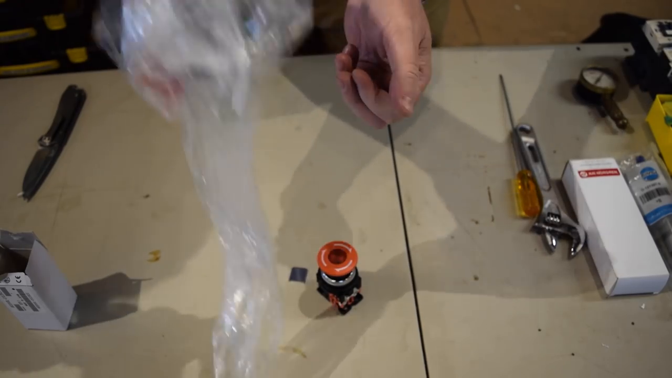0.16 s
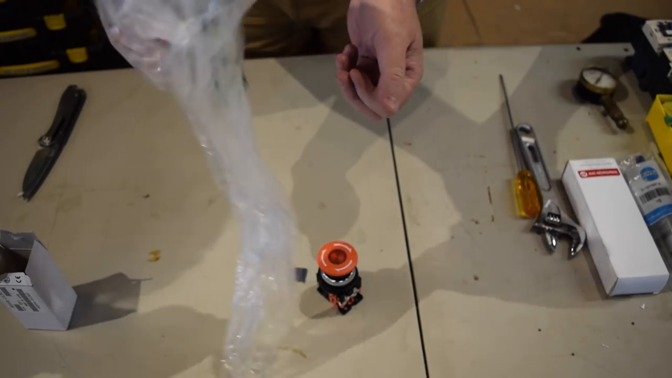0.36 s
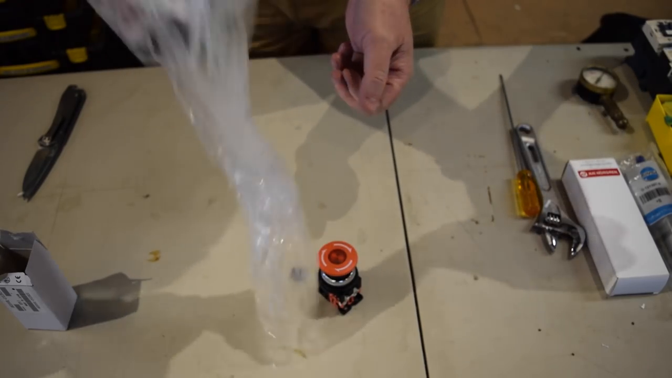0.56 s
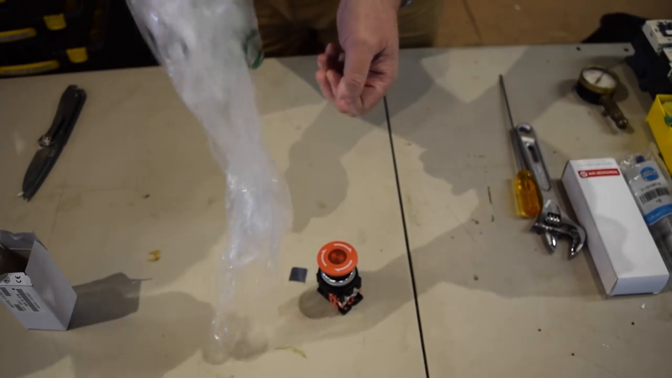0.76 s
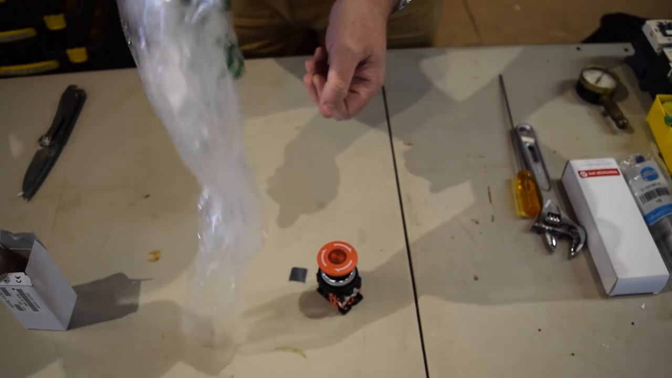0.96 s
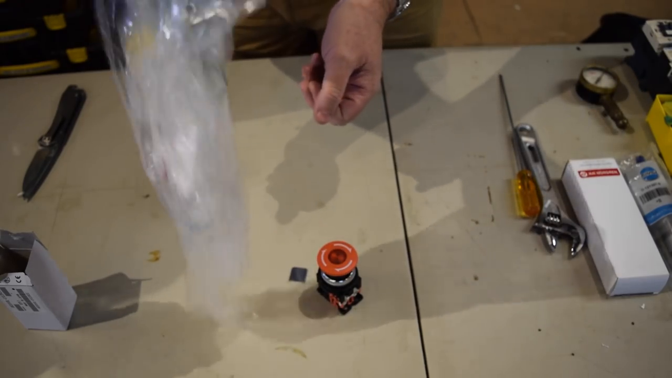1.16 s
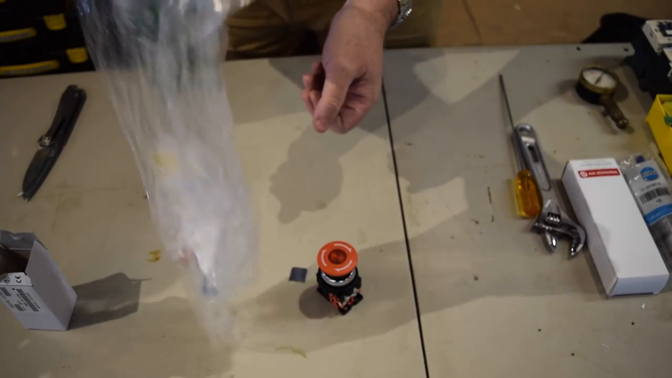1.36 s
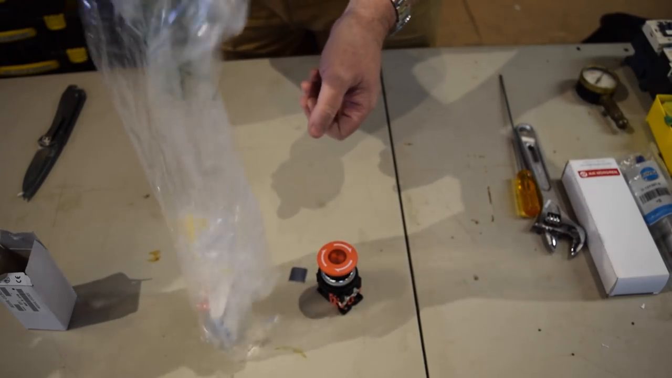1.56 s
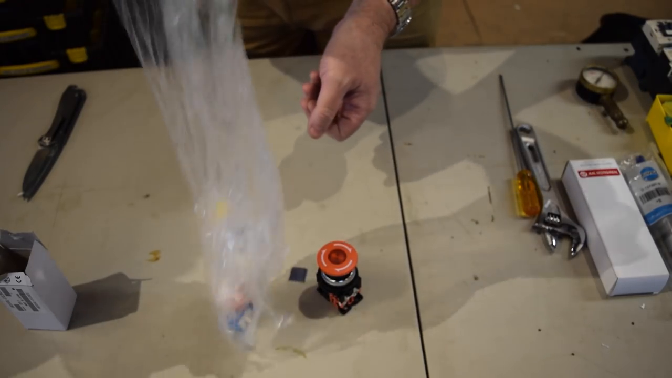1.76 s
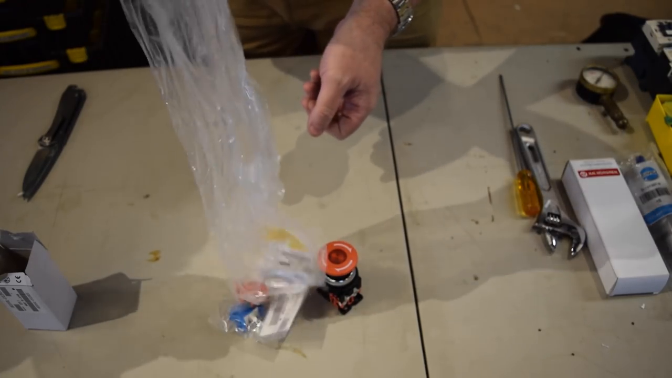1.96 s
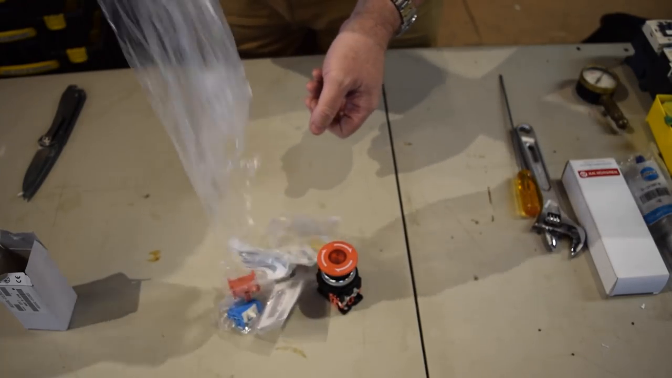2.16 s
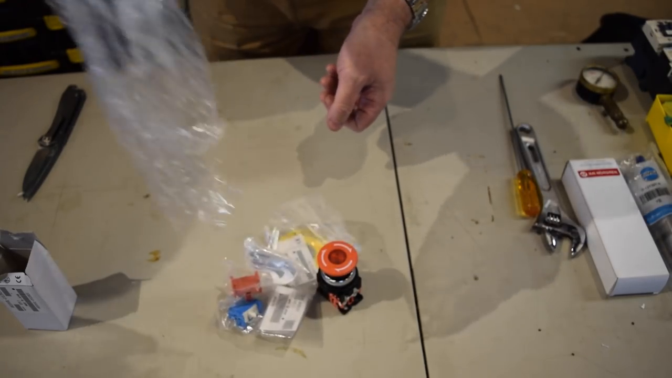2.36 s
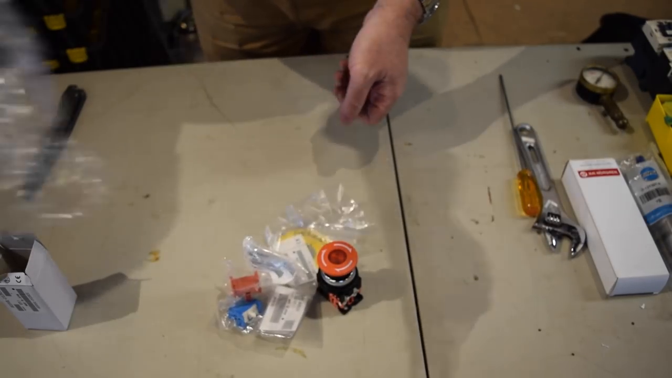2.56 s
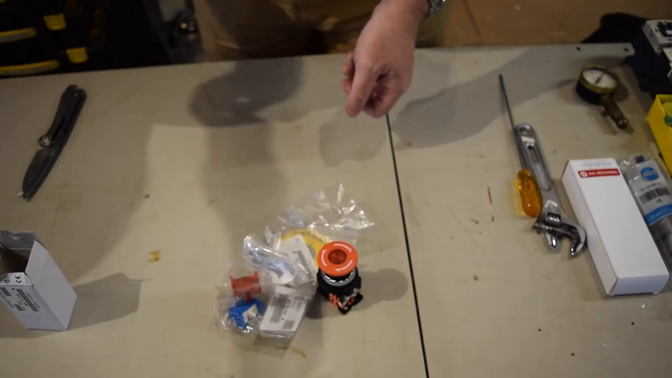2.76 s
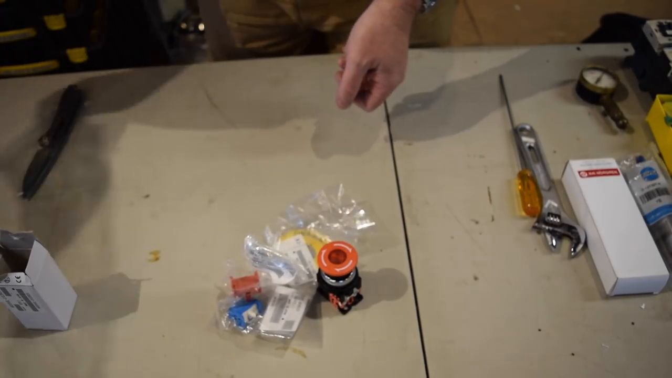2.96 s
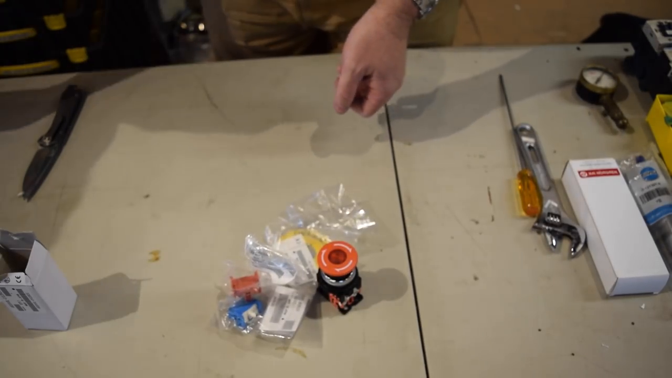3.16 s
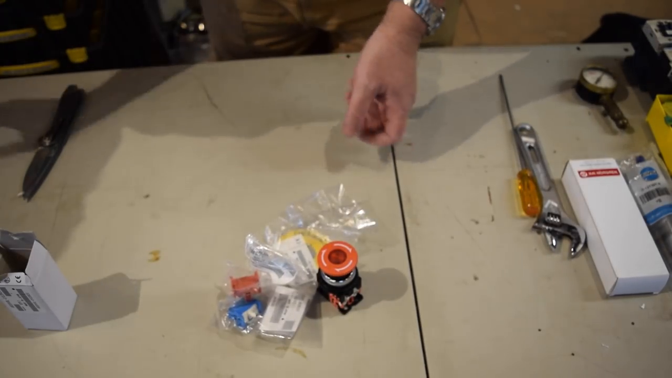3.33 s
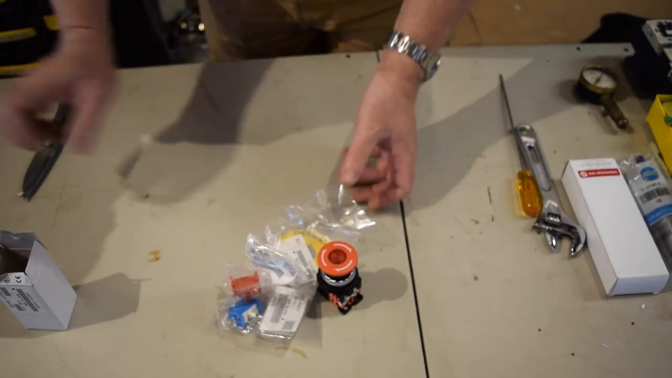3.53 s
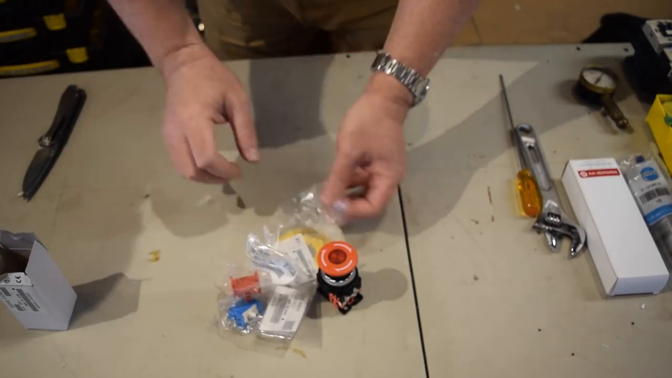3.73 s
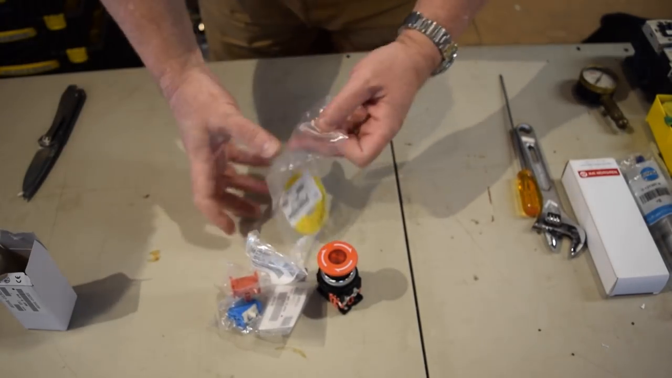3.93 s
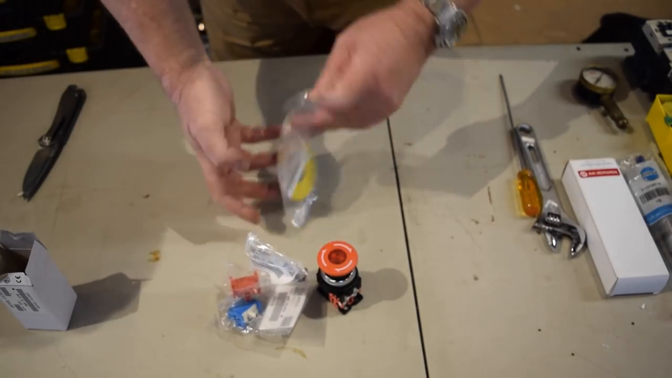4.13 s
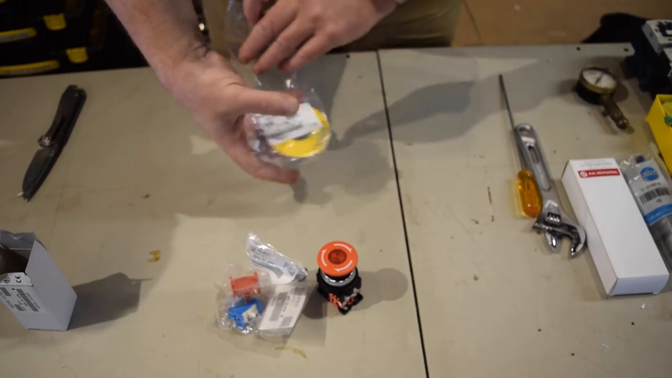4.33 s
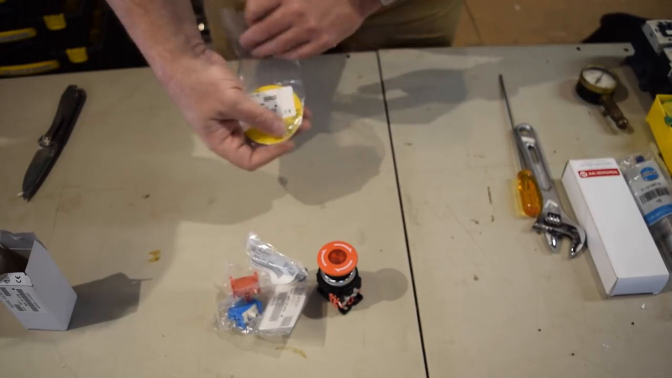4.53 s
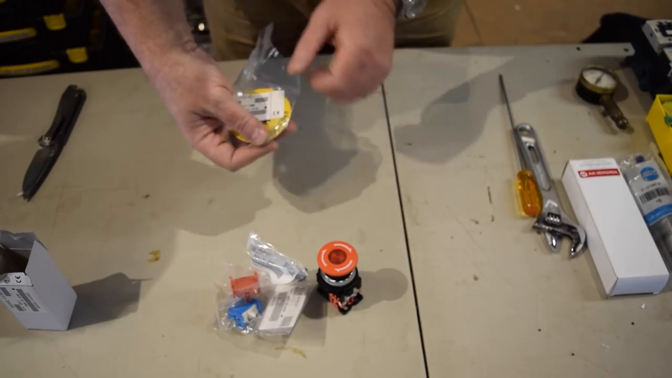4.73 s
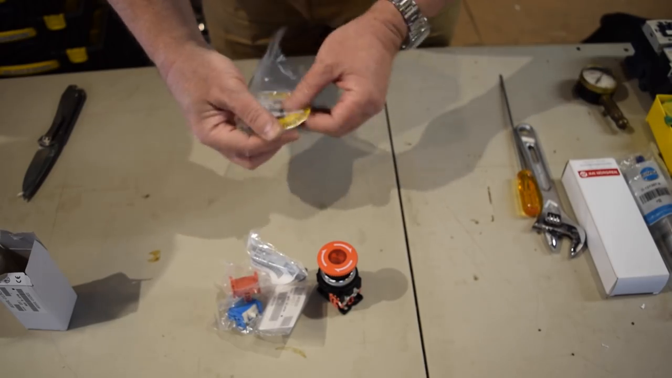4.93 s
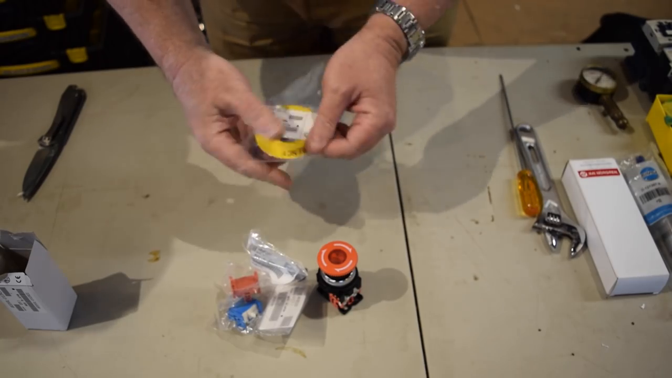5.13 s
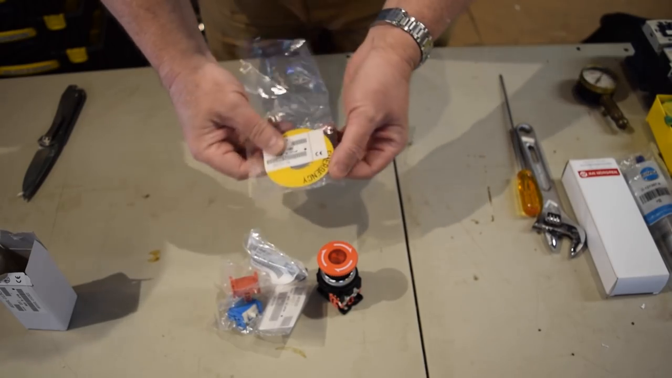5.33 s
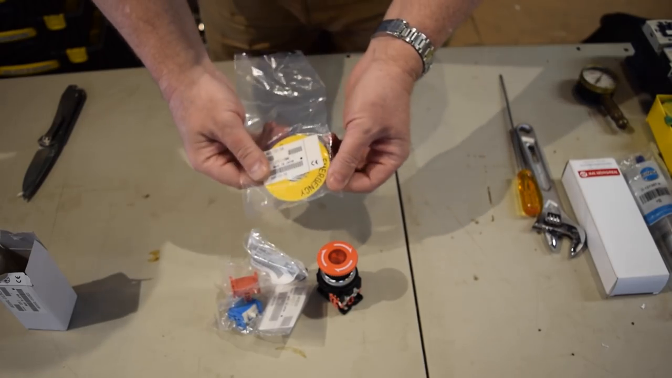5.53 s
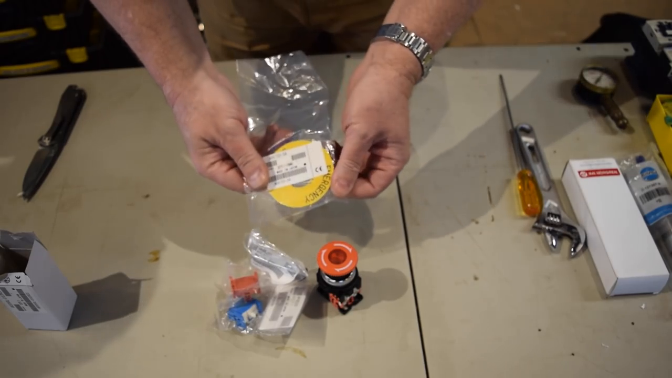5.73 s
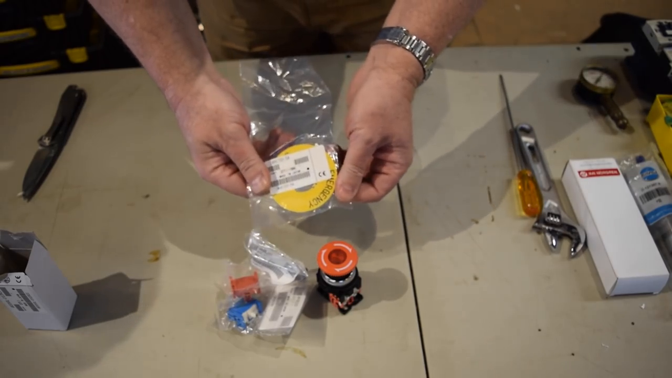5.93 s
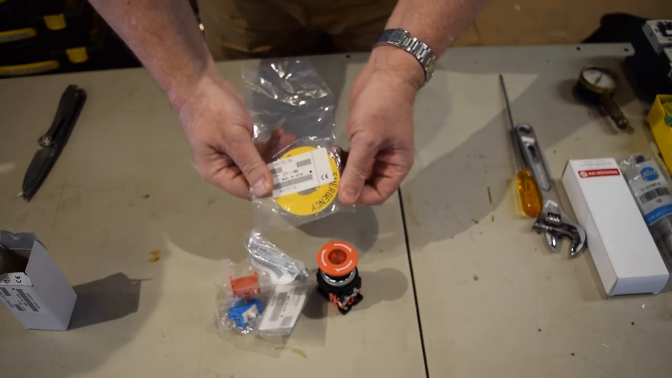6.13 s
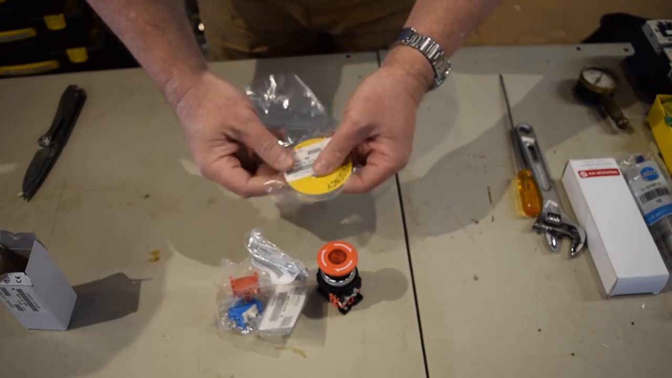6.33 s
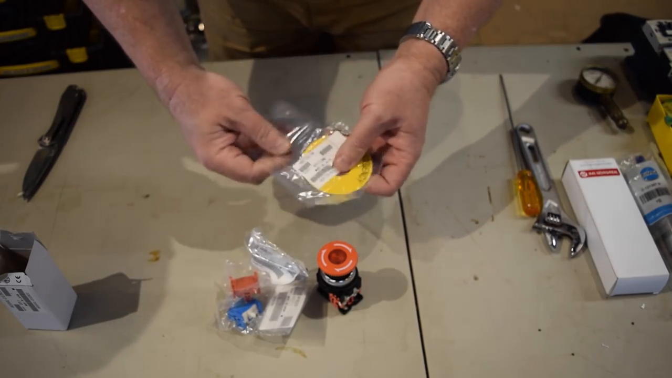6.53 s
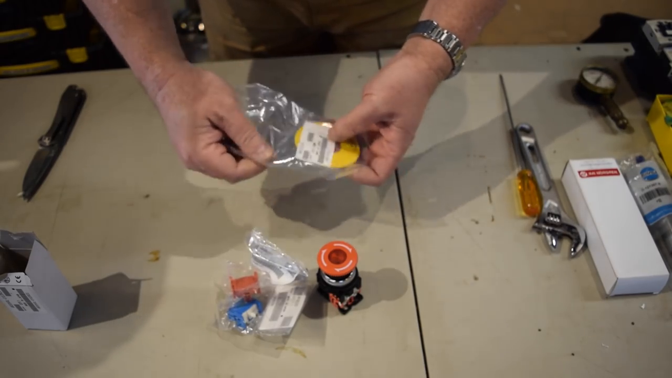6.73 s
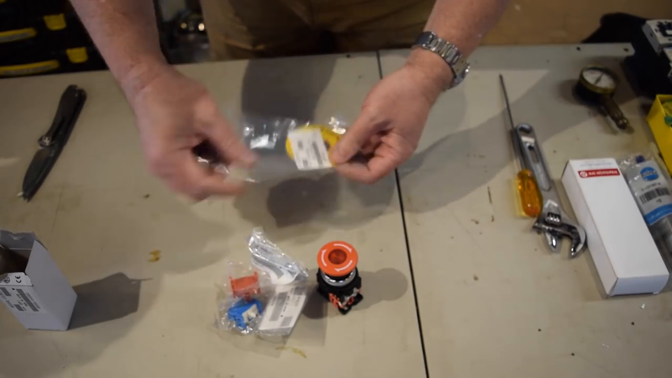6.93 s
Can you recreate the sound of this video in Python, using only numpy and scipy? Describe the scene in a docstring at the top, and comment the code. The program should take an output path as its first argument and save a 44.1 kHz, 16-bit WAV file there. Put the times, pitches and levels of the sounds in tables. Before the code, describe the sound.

Dense rushes of loose plastic film come roughly five or six a second, then a woody thump and clatter as small parts land on a workbench. After that everything is much quieter: sparse limp bag crinkles, a near pause, then intermittent brittle crackling of a small packet pressed and turned around a plastic disc. Close, fairly dry microphone, short room tail, steady low machine hum and soft air noise.

```python
"""A long plastic bag is shaken over a workbench: each shake is a dense rush of buckling film facets.
Bagged parts slide out and knock on the top, as damped bench modes with a clack of their plastic shells.
The limp, empty bag is put aside with sparser crinkles; fingers then pick up a small packet and turn it
over, its stiffer film crinkling against a resonant disc. Short ringing snaps of creases, parts and disc
stand out, in a small workshop whose air noise, steady hum lines and deep throb last from start to end."""
import sys
import numpy as np
from scipy import signal
from scipy.fft import rfft, irfft, next_fast_len
from scipy.io import wavfile
from scipy.ndimage import map_coordinates

SR = 44100
rng = np.random.default_rng(int(sys.argv[2]) if len(sys.argv) > 2 else 0)


def inscribe(sig):
    """Save sig as 16-bit PCM at rate SR to the path in sys.argv[1].

    A 1-D sig is mono; a 2-D sig holds one channel per row.
    Samples are clipped to [-1, 1] before scaling.
    """
    pcm = np.round(np.clip(np.atleast_2d(sig).T, -1, 1) * 32767)
    wavfile.write(sys.argv[1], SR, pcm.astype(np.int16))


N = 308259

# Shakes of the long bag. Each row: centre in seconds, peak level in dB, fall to 1/e in seconds.
BAG_SHAKES = [(0.11, -23.5, .02), (.271, -23.5, .019), (0.436, -25.5, .027), (.606, -25, .032),
              (.797, -25.5, .028), (0.984, -26, 0.028), (1.177, -28, .045), (1.37, -30, .045)]
# Rustle of the long bag between shakes, fading as it empties. Each row: time in seconds, level in dB.
BAG_RUSTLE = [(0, -37.5), (1.22, -36), (1.55, -39), (1.68, -44.5), (1.8, -42), (1.9, -47), (2.15, -47),
              (2.36, -57.5), (2.6, -100)]
# Spectrum of the long bag's film. Each row: frequency in Hz, relative density in dB per Hz.
BAG_SPECTRUM = [(120, -23), (200, -6), (273, 7), (299, 3), (558, 8), (899, 4), (1270, 4.5), (1420, 2.5),
                (3310, 3.5), (3690, 2.5), (10300, 1.5), (13800, -4.5), (16000, -18)]
# Sweeps of the limp, empty bag, swung aside and laid down.
# Each row: start of the hold in seconds, hold in seconds, level in dB.
EMPTY_BAG_SWEEPS = [(2.403, 0.011, -42.5), (2.452, 0.034, -44), (2.6, 0.084, -51.5), (3.158, 0.0268, -39.5),
                    (3.238, 0.034, -40), (3.29, .025, -51)]
# Spectrum of the empty bag's film. Each row: frequency in Hz, relative density in dB per Hz.
EMPTY_BAG_SPECTRUM = [(200, -9), (700, -3.5), (1200, -8), (1600, -8), (2050, -4.5), (2900, -8.5),
                      (5000, -8.5), (10000, -15.5), (16000, -27)]
# Parts meeting the bench. Each row: time in seconds, blow in relative dB, hardness of contact in dB,
# level of the part's clack in dB, pitch of the clack in Hz.
PART_KNOCKS = [(1.5012, -0.5, 0, -23, 4300), (1.504, -8.5, -3, -32, 3750), (1.526, -6.5, 3.5, -26, 3230),
               (1.594, -32, 7, -50, 3200), (1.68, -29, 3, -56, 3030), (1.774, -24.5, 6, -40, 2640),
               (1.796, -20.5, 0, -33, 2670), (1.812, -16.5, -0.5, -24, 3040), (2.054, -9, 4, -25, 3860),
               (2.0591, -21.5, 5, -36, 3900), (2.113, -28, 6, -39, 3140), (2.301, -28.5, 7, -37, 3770),
               (3.953, -32, 0, -50.5, 4180)]
# Ringing modes of the bench top. Each row: frequency in Hz, relative level in dB.
BENCH_MODES = [(118, 1), (176, 2), (308, 7), (353, 3), (395, 2), (435, -4), (552, 8), (592, 2), (668, 1),
               (713, 1), (759, -7), (919, 1), (948, -4), (1224, -3)]
# The bench's dense, short-lived modes. Each row: frequency in Hz, relative density in dB per Hz.
THUD_SPECTRUM = [(50, -22), (115, -7), (160, -4), (240, -10.5), (310, 2), (450, 1), (700, -3), (1000, -3),
                 (1450, -9), (1900, -16.5), (2600, -19.5), (3500, -25), (6000, -32.5), (14000, -46)]
# Finger moves on the small packet. Each row: start of the hold in seconds, hold in seconds, level in dB.
PACKET_MOVES = [(3.738, .08, -43), (3.88, .22, -53.5), (4.15, .05, -50.5), (4.275, 0.023, -49),
                (4.357, .045, -43.5), (4.44, .07, -43.5), (4.91, 0.16, -54), (5.165, .1, -48.5),
                (5.395, .03, -46), (6.135, .06, -45.5), (6.26, 0.079, -47), (6.43, 0.071, -44),
                (6.545, 0.05, -41), (6.62, 0.12, -51), (6.86, 0.056, -46), (6.92, 0.05, -40)]
# Spells in which the packet is turned and its film whispers. Each row: start and length in seconds.
PACKET_TURNS = [(3.68, 0.92), (4.85, .7), (6.14, .85)]
TURNING_DB = -57
# Spectrum of the packet's film. Each row: frequency in Hz, relative density in dB per Hz.
PACKET_SPECTRUM = [(150, -9), (450, 0), (700, -6), (1150, -3), (1600, -8.5), (2300, -3.5), (5000, -6),
                   (9000, -7), (14000, -11), (16000, -21)]
# How firmly the film is pressed on the plastic disc. Each row: time in seconds, coupling in dB.
DISC_COUPLING = [(4, -4), (4.48, -1), (5.2, -8), (6.15, 2), (6.33, 5), (6.58, 5), (6.95, -4)]
# The disc's damped modes. Each row: frequency in Hz, relative level in dB.
DISC_MODES = [(450, 0), (860, 6)]
# The loudest snaps: creases snapping through, clacks of parts inside the bag, and taps on the disc.
# Each row: time in seconds, level over the first 4 ms in dB, ring in Hz, treble share in dB before it
# is scaled and limited.
LOUD_SNAPS = [(0.1746, -26, 6660, -4), (0.1806, -26.5, 3320, -7), (.272, -17.5, 2580, -28),
              (.4994, -21.5, 3000, -29), (.511, -31, 8010, 9), (0.7447, -31, 4730, -8),
              (1.0634, -28, 4070, -1), (1.643, -42, 1370, 6), (2.4068, -36, 1850, -7),
              (2.4186, -34.5, 2280, -12), (2.471, -43, 2110, -20), (2.4848, -37, 1850, -25),
              (2.639, -39.5, 11100, 8), (2.6674, -37.5, 2260, -20), (2.7813, -44.5, 10080, 2),
              (2.8038, -40.5, 1940, 3), (2.8198, -44, 5270, -4), (2.9778, -41.5, 1820, 2.5),
              (3.102, -37, 6300, 4), (3.1486, -39, 2890, 0), (3.1682, -35.5, 7740, 2),
              (3.2362, -41, 2100, 1), (3.2479, -41, 2080, 2), (3.6735, -34, 2770, -1),
              (4.0432, -40.5, 10500, 0), (4.0713, -41.5, 8500, 4.5), (4.392, -35.5, 2700, 0),
              (4.449, -25.5, 8300, -12), (4.474, -29.5, 1650, 0), (4.6185, -41.5, 2570, -30),
              (5.0205, -40, 9030, 3), (5.1669, -38.5, 2100, 2), (5.4018, -38, 9900, 1.5),
              (5.4204, -39, 2280, 1.5), (5.4567, -37, 950, 5), (5.508, -36, 11200, 3),
              (5.589, -45, 6370, -12), (6.3226, -29, 1040, -14), (6.5467, -38, 1030, -11),
              (6.599, -33, 4650, -19), (6.781, -37, 2560, -2.5), (6.859, -37.5, 3020, 9),
              (6.965, -35, 5100, 1)]
# Spells of disturbed film in which weaker creases let go. Each row: start and end in seconds,
# snaps a second, middle level in dB, middle ring in Hz, treble share in dB as above.
WEAK_SNAPS = [(0, 1.45, 13.6, -32, 5160, 3.5), (1.594, 2.25, 9, -41.5, 6000, 1),
              (2.411, 2.68, 30.5, -44, 2240, -9), (2.698, 3.12, 22, -50, 4940, -6),
              (3.702, 4.55, 11.3, -49.5, 5500, -5), (4.88, 5.6, 10, -51.5, 4470, -4),
              (6.148, 6.98, 12.7, -43.5, 4050, -1)]
# Decay of the room's diffuse tail. Each row: frequency in Hz, time to fall 60 dB in seconds.
ROOM_DECAY = [(150, 0.81), (1000, 0.96), (4000, 0.84), (14000, 0.033)]
# Air noise of the still workshop. Each row: frequency in Hz, relative density in dB per Hz.
AIR_SPECTRUM = [(25, -32), (50, -4.5), (65, -16), (120, -4.5), (148, -8.5), (190, -4.5), (245, -9.5),
                (290, -8), (520, -15), (1070, -19), (1500, -22), (4000, -34), (10000, -43), (16000, -51)]
# Lines of the machine hum. Each row: frequency in Hz, middle rms level in dB.
HUM_LINES = [(119.5, -57.5), (187, -58), (222, -60), (271, -57.5), (353, -70), (552, -68)]

# every handling stroke rises quickly, holds and dies away
ATTACK_S, RELEASE_DB_PER_S = .012, 257
SNAP_Q, CRACK_DAMPING = 6.2, 0.55  # sharpness of a snap's ring; a hard crack shortens it
STRAY_SPREAD_DB, STRAY_SPREAD_OCTAVES = 6.5, 0.58  # largest departure either way of the weak creases
THROB_HZ, THROB_DB = 43.4, -53  # deep hum and its middle level
BEAT_S, BEAT_CREST_S, BEAT_DB = .359, 0.43, 3.5  # period, time of one crest, swing either way
LULL_S, LULL_WIDTH_S, LULL_DB = 5.47, .5, -10  # centre, fall to 1/e, depth of the deep hum's lull
TOP_HZ = 16100  # band limit


def long_bag():
    """Buckling of loose film: each shake whips it into a rush, and it sounds hollower once empty."""
    t = clock(N)
    whip = sum(amp(db) * np.exp(-((t - s) / width) ** 2) for s, db, width in BAG_SHAKES)
    rush = crackle(whip, BAG_SPECTRUM, rate=1100, spread_db=5, clump_db=2.5, t60=.006, ring=1.1, rub=.5)
    rustle = crackle(amp(curve(BAG_RUSTLE)), BAG_SPECTRUM,
                     rate=400, spread_db=6.5, clump_db=4.5, t60=.007, ring=1.2, rub=.45)
    limp = crackle(strokes(EMPTY_BAG_SWEEPS), EMPTY_BAG_SPECTRUM,
                   rate=180, spread_db=6, clump_db=5, t60=.007, ring=.7, rub=.42)
    return rush + rustle + limp


def knocks():
    """Impact excitation: a part pushes the bench top, rings its modes and clacks in its plastic shell."""
    out = np.zeros(N)
    t = clock(SR * 3 // 4)
    # most of the blow dies at once; the loaded bench shudders on faintly
    shudder = fade(t, t60=.095) + amp(-20) * fade(t, t60=.55)
    for s, db, hard_db, clack_db, clack_hz in PART_KNOCKS:
        modes = np.zeros(len(t))
        for hz, level in BENCH_MODES:
            strength = amp(level + rng.normal(0, 2))  # each blow excites the modes a little differently
            modes += strength * np.sin(2 * np.pi * (hz * t + rng.random()))
        modes = head(modes * fade(t, t60=.26), size=882)
        # a hard contact lifts the upper modes, a soft one lowers them
        contact = [(hz, level + hard_db * along([(700, 0), (1400, 0.97)], hz))
                   for hz, level in THUD_SPECTRUM]
        thud = head(colour(rng.standard_normal(len(t)) * shudder, contact), size=882)
        push = .6 * np.sin(2 * np.pi * 370 * t) * fade(t, t60=.007)
        push += .8 * np.sin(2 * np.pi * 720 * t) * fade(t, t60=.008)
        add(out, s, amp(db) * (amp(-18.5) * modes + amp(-12) * thud + push))
        shell = resonate(burst(t60=0.019, size=2048), clack_hz, q=4.4)
        shell = resonate(shell, clack_hz, q=2.7)
        clatter = burst(t60=0.022, size=2048)
        add(out, s, amp(clack_db) * (head(shell) + 0.41 * head(clatter)))
    # the knocks carry no deep bass
    return signal.sosfilt(signal.butter(3, 85, "highpass", fs=SR, output="sos"), out)


def packet():
    """Coupled vibration: stiffer film, crinkled and rubbed by fingers, also drives the disc inside."""
    turning = [(s, length, TURNING_DB) for s, length in PACKET_TURNS]
    motion = strokes(PACKET_MOVES + turning)
    film = crackle(motion, PACKET_SPECTRUM, rate=300, spread_db=6, clump_db=5.5, t60=.006, ring=1.1, rub=.4)
    disc = sum(amp(db) * resonate(film, hz, q=3.1) for hz, db in DISC_MODES)
    return film + amp(curve(DISC_COUPLING)) * disc


def snaps():
    """Impulse response: a flipped crease, clacking part or tapped disc rings briefly under a bright crack."""
    out = np.zeros(N)
    bright = [(300, -12), (1200, -3), (9000, 0), (12500, -5), (16000, -12)]  # (Hz, dB)
    for s, db, hz, treble_db in LOUD_SNAPS + strays():
        crack = head(colour(burst(t60=.0045), bright))
        share = np.clip(.8 * amp(treble_db), 0, .7)
        ring = head(resonate(burst(t60=.006), hz, q=SNAP_Q * (1 - CRACK_DAMPING * share)))
        snap = np.sqrt(1 - share ** 2) * ring + share * crack
        add(out, s, amp(db) * head(snap))
        # the film around gives a little, just before or after
        for offset in rng.uniform(-.005, 0.0078, size=3):
            neighbour_hz = hz * np.exp(rng.normal(0, 1.0))
            neighbour = resonate(burst(t60=0.0059), neighbour_hz, q=1.14)
            add(out, s + offset, amp(db - 10) * head(neighbour))
    return out


def strays():
    """Random release: rows like LOUD_SNAPS for the weak creases, one at a random place in each time slot."""
    rows = []
    for start, end, rate, db, hz, treble_db in WEAK_SNAPS:
        gap = 1 / max(rate, 1)
        slots = np.arange(start + gap / 2, end, gap)
        chance = rng.uniform(-1, 1, (64, 3))
        for s, (late, loud, high) in zip(slots, chance):
            level = db + STRAY_SPREAD_DB * loud
            pitch = hz * 2 ** (STRAY_SPREAD_OCTAVES * high)
            rows.append((s + late * gap / 2, level, pitch, treble_db))
    return rows


def crackle(level, film, rate, spread_db, clump_db, t60, ring, rub, count=24):
    """Shot noise: buckles of many facets, each with its own pitch and denser with motion, over a rub hiss."""
    busy = np.sqrt(level / level.mean())
    # one buckle sets off others, so they come in short avalanches
    avalanche = amp(clump_db * np.clip(wobble(130), -2, 2))
    # rate is in buckles a second where the level is at its mean
    chance = busy * avalanche / avalanche.mean() * rate / count / SR
    grains = np.zeros(N)
    for hz in np.geomspace(1200, 12000, count):
        fires = rng.random(N) < chance
        jolts = np.zeros(N)
        jolts[fires] = amp(spread_db * np.clip(rng.standard_normal(fires.sum()), -2, 1.3))
        facet = unit(burst(t60)) + ring * unit(resonate(burst(t60), hz, q=4.5))
        grains += signal.oaconvolve(jolts, facet)[:N]
    # offset the loudness that denser buckles bring, so that level alone sets it
    grains = colour(grains, film) / np.sqrt(busy + .05)
    grains /= np.sqrt(np.average(grains ** 2, weights=busy))
    hiss = unit(colour(rng.standard_normal(N), film))
    return level * (grains + rub * hiss) / np.hypot(1, rub)


def strokes(rows):
    """Power addition: overlapping handling strokes, each of attack, hold and release, as one level."""
    t = clock(N)
    power = np.zeros(N)
    for s, hold, db in rows:
        rise = np.clip(1 + (t - s) / ATTACK_S, 0, 1)  # complete at s
        release_db = RELEASE_DB_PER_S * np.clip(t - s - hold, 0, 1)
        power += (rise * amp(db - release_db)) ** 2
    return np.sqrt(power) + 1e-9


def room(x):
    """Reverberation: the bench reflects at once and the walls answer with a short diffuse tail."""
    hz, t, z = signal.stft(rng.standard_normal(SR // 2), SR, nperseg=256)
    decay = fade(t, along(ROOM_DECAY, hz)[:, None])
    tail = signal.istft(z * decay, SR, nperseg=256)[1]
    early = rng.standard_normal(700) * fade(clock(700), .025)

    def answer(response, delay):
        """Convolution with a unit-energy response, delayed in samples."""
        delayed = np.pad(response / np.linalg.norm(response), (delay, 0))
        return signal.fftconvolve(x, delayed)[:N]

    return x + amp(-17.5) * answer(early, delay=90) + amp(-15.5) * answer(tail, delay=300)


def workshop():
    """Stationary background: coloured air noise, slightly unsteady machine lines and a deep throb."""
    t = clock(N)

    def tone(hz, drift):
        """Phase modulation: a sine whose phase wanders by drift in radians."""
        return unit(np.sin(2 * np.pi * hz * t + drift * wobble(5)))

    hum = sum(amp(db + 0.54 * wobble(3.89)) * tone(hz, drift=1.0) for hz, db in HUM_LINES)
    air = amp(-47) * unit(colour(rng.standard_normal(N), AIR_SPECTRUM))
    return air + hum + amp(throb_db()) * tone(THROB_HZ, drift=0.76)


def throb_db():
    """Amplitude modulation: level of the deep hum in dB, with a steady beat and one lull."""
    t = clock(N)
    beat = BEAT_DB * np.cos(2 * np.pi * (t - BEAT_CREST_S) / BEAT_S)
    lull = LULL_DB * np.exp(-((t - LULL_S) / LULL_WIDTH_S) ** 2)
    return THROB_DB + beat + lull


def burst(t60, size=1024):
    """Impulsive excitation: a sharp jolt with a dying flutter of noise."""
    t = clock(size)
    return rng.standard_normal(size) * fade(t, t60) + 2 * (t == 0)


def resonate(x, hz, q):
    """Resonance: one mode of sharpness q."""
    b, a = signal.iirpeak(min(hz, SR / 3), max(q, 1), SR)
    return signal.lfilter(b, a, x)


def colour(x, points, size=4096):
    """Minimum-phase filtering: a causal filter with the gain of (Hz, dB) points, by the folded cepstrum."""
    gain = amp(along(points, np.fft.rfftfreq(size, 1 / SR)))
    cepstrum = irfft(np.log(gain))
    cepstrum[1:size // 2] *= 2
    cepstrum[size // 2 + 1:] = 0
    response = irfft(np.exp(rfft(cepstrum)))
    return signal.fftconvolve(x, response)[:len(x)]


def fade(t, t60):
    """Exponential decay: 60 dB down at t60."""
    return np.exp(-np.log(1000) * t / t60)


def wobble(rate):
    """Band-limited randomness: a smooth random curve with rate knots a second."""
    knots = rng.standard_normal(int(N * rate / SR) + 4)
    return map_coordinates(knots, [clock(N) * rate])


def along(points, hz):
    """Logarithmic frequency scale: (Hz, value) points interpolated at hz."""
    f, v = np.transpose(points)
    return np.interp(np.log(hz + 1), np.log(f + 1), v)


def curve(rows):
    """Linear interpolation: (seconds, value) rows as one value per sample."""
    return np.interp(clock(N), *np.transpose(rows))


def head(x, size=176):
    """Onset level: scale to rms 1 over the first size samples, 4 ms by default."""
    return x / np.sqrt(np.mean(x[:size] ** 2) + 1e-20)


def unit(x):
    """Effective value: scale to rms 1."""
    return x / np.sqrt(np.mean(x ** 2) + 1e-20)


def amp(db):
    """Decibel law: the amplitude ratio of a level in dB."""
    return 10 ** (np.asarray(db) / 20)


def clock(size):
    """Uniform sampling: the time of each sample in seconds."""
    return np.arange(size) / SR


def add(track, s, sound):
    """Superposition: mix a sound into the track at time s."""
    part = track[max(round(s * SR), 0):][:len(sound)]
    part += sound[:len(part)]


def scene():
    """Superposition: the handling sounds excite the room, and the workshop lies beneath."""
    handling = long_bag() + packet() + snaps() + knocks()
    return (room(handling) + workshop())[None]


def record(dry):
    """Limiting: peaks are clipped at full scale, then everything from the band limit up is removed."""
    clipped = np.clip(dry, -1, 1)
    size = next_fast_len(N + 8192)
    passed = np.fft.rfftfreq(size, 1 / SR) < TOP_HZ
    return irfft(rfft(clipped, size) * passed, size)[:, :N]


dry = scene()
out = record(dry)
inscribe(out)
```